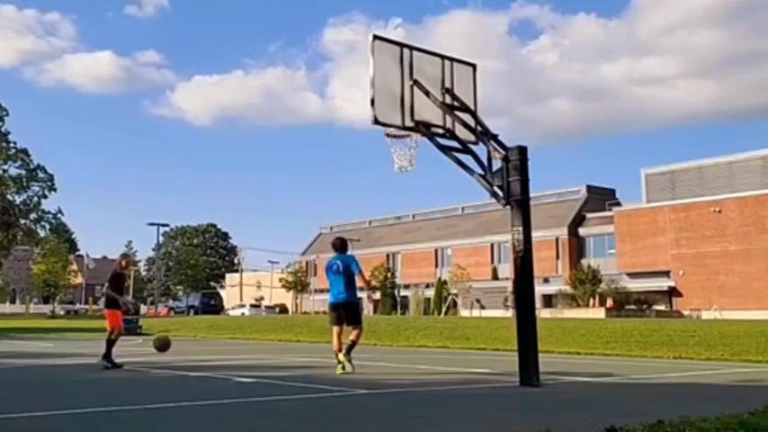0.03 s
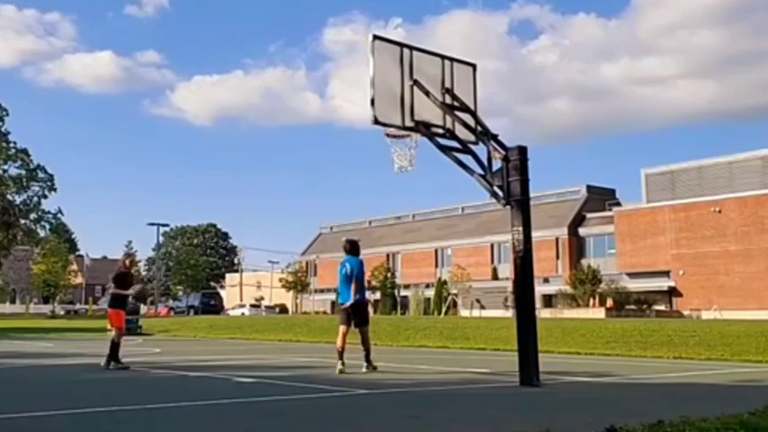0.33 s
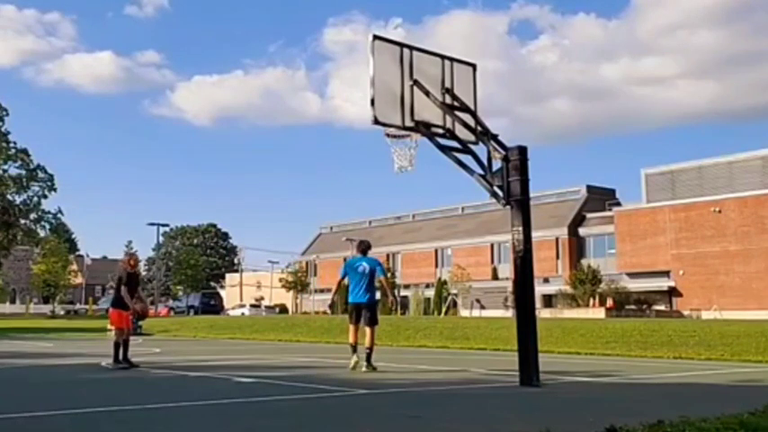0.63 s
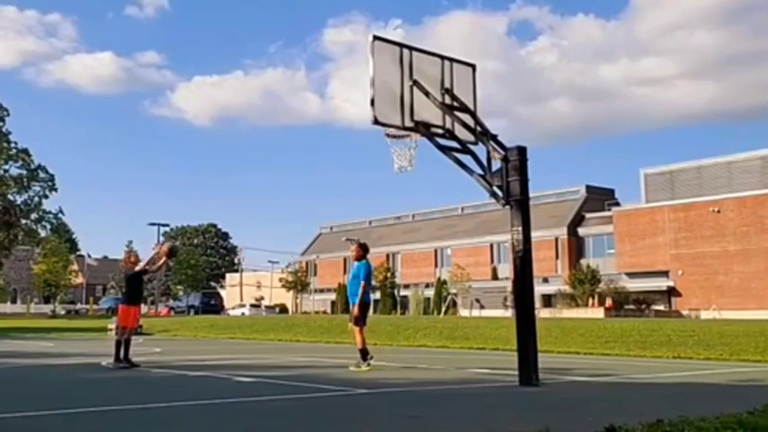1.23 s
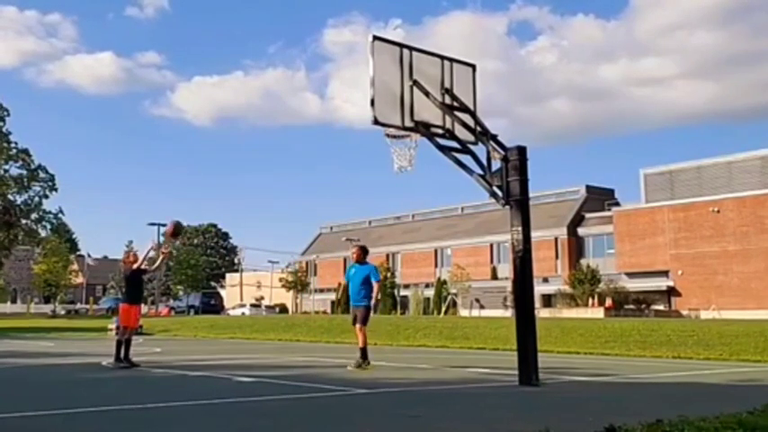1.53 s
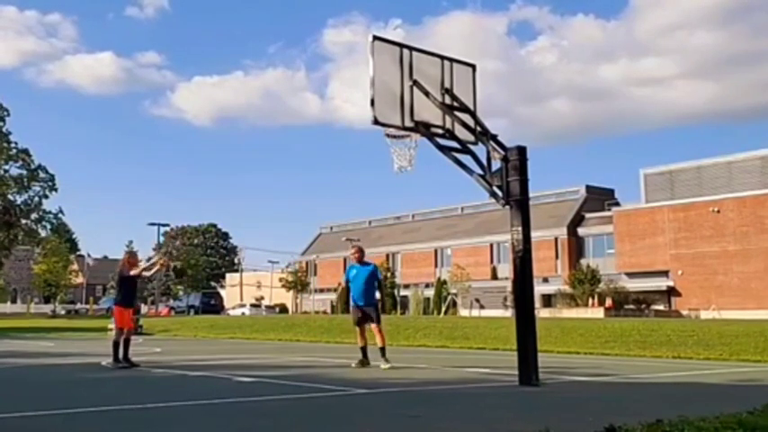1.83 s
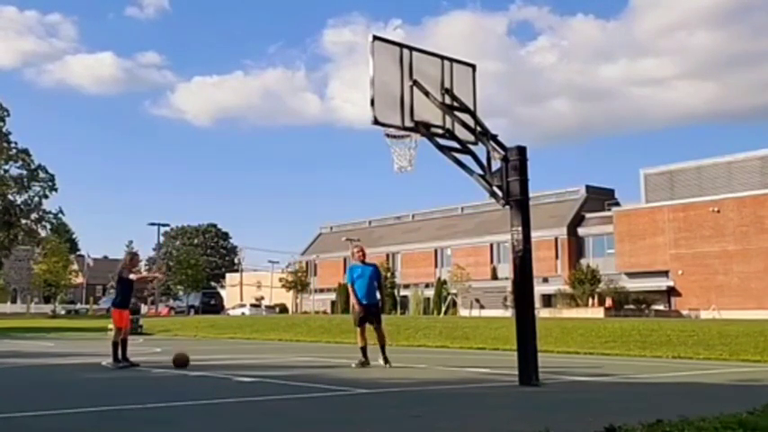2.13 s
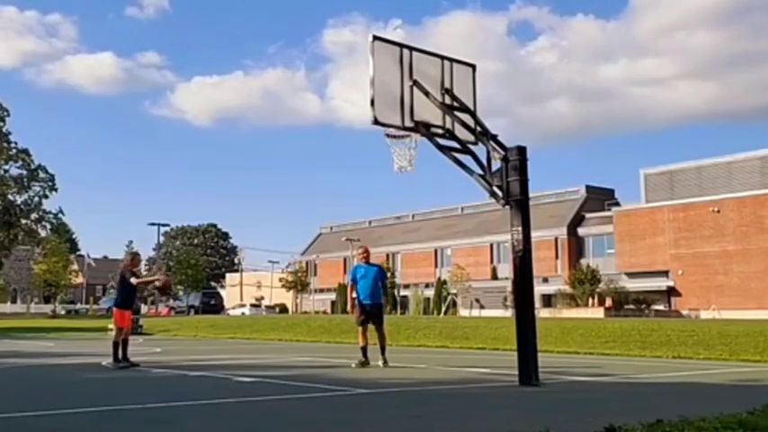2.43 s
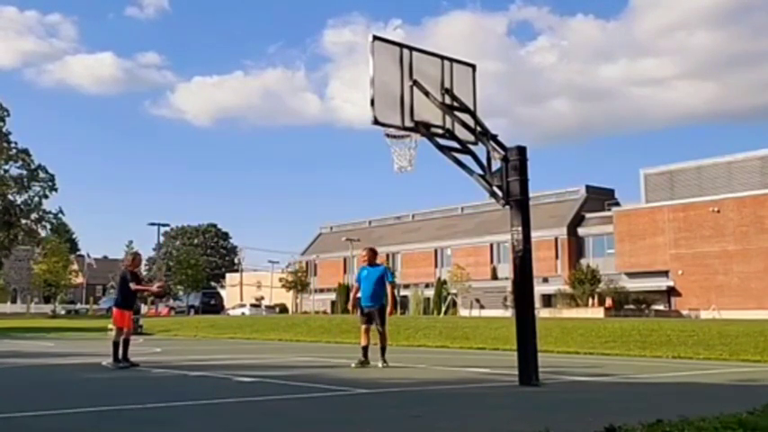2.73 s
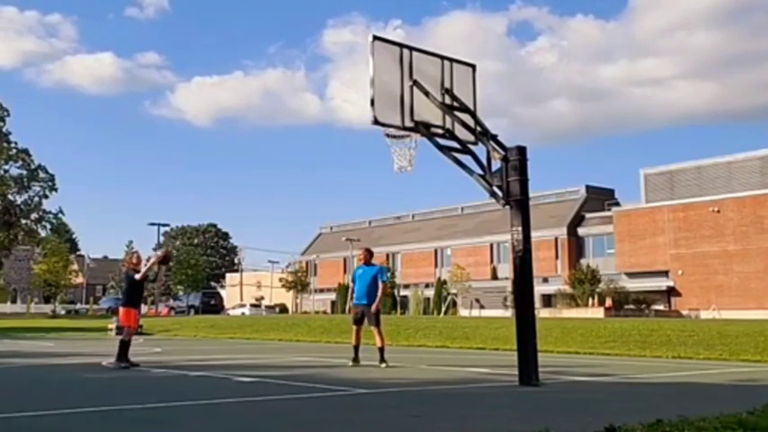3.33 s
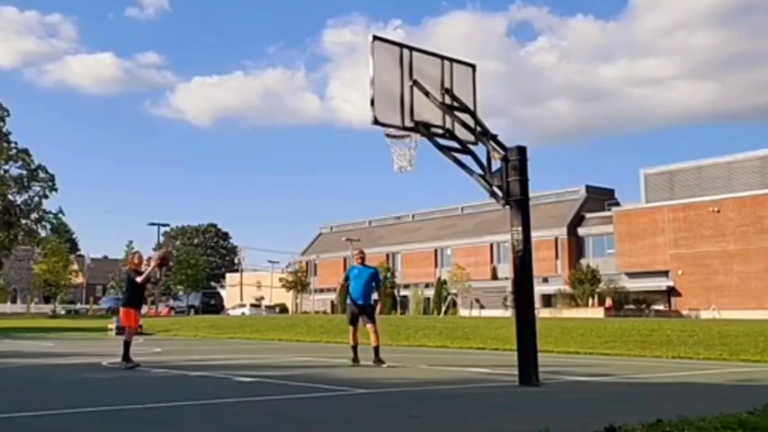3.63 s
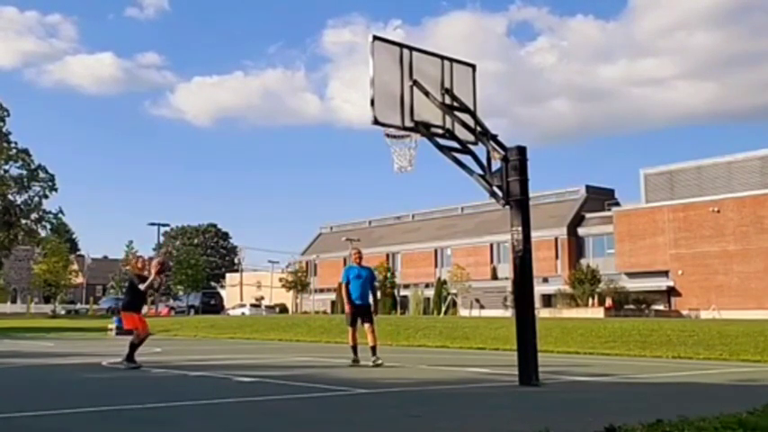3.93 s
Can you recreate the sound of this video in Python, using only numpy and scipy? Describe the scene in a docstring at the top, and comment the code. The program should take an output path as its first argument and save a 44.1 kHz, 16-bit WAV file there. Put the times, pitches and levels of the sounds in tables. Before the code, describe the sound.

Some metres away on an outdoor court, a basketball lands with a slapping thump. Shoes scuff and skid softly on gritty ground, then the ball bounces once more. Far traffic hums throughout, one engine rising at the end.

```python
"""Basketball on an outdoor court

A ball bounces twice on hard ground, some metres away. Each bounce is a slap of its skin, a deep
thump and a faint ping of the air inside, followed by a few echoes and a short wash of sound.
Shoes scuff and skid on the gritty surface, while distant traffic rumbles and swells behind."""
import sys
import numpy as np
from scipy import signal
from scipy.fft import rfft, irfft
from scipy.io import wavfile

SR = 44100
rng = np.random.default_rng(int(sys.argv[2]) if len(sys.argv) > 2 else 0)


def waveform_to_disk(signal):
    """Save audio, clipped to [-1, 1], as 16-bit WAV at the path in sys.argv[1]."""
    frames = np.transpose(np.atleast_2d(signal))
    scaled = np.clip(frames, -1, 1) * 32767
    samples = np.round(scaled).astype(np.int16)
    wavfile.write(sys.argv[1], SR, samples)


N = 176400
TIME = np.arange(N) / SR
FREQUENCIES = np.arange(N // 2 + 1) * SR / N
SHOE_FADE_S = 0.34   # every "fade" is the time a sound takes to drop by 60 dB
SCATTER_STEREO_DB = -34.5   # scattered sound differs a little between left and right

# When the ball lands, and how much each part of its sound is turned up or down:
# (time [s], thump [dB], slap [dB], crack [dB], ping [dB], tail [dB], rebound [dB])
BOUNCES = [(0.0940, 20, -18.5, -24.5, -61, -0.5, -2.5), (2.2863, 24.5, -26.5, -23.5, -49, -2, -17)]


def from_db(db):
    """Turn decibels into a number to multiply a sound by."""
    return 10 ** (np.asarray(db) / 20)


def at_hz(points, hz):
    """Read between the rows of a frequency table, with octaves evenly spaced."""
    known_hz, value = np.transpose(points)
    return np.interp(np.log(np.maximum(hz, 1)), np.log(known_hz), value)


def swell(points):
    """A volume that glides through a table of times and decibels."""
    return from_db(np.interp(TIME, *np.transpose(points)))


def butter(x, hz, kind, order=2):
    """A filter that keeps the lows, the highs or a band in between."""
    return signal.sosfilt(signal.butter(order, hz, kind, fs=SR, output="sos"), x + 1e-18)


def noise(spectrum, stereo_db=-59.5):
    """Noise shaped by a frequency table, almost the same on the left and right."""
    roll_off = 1 + (FREQUENCIES / spectrum[-1][0] / 2) ** 4
    colour = from_db(at_hz(spectrum, FREQUENCIES)) / roll_off
    mid, side = irfft(rfft(rng.standard_normal((2, N))) * colour, N)
    return (mid + from_db(stereo_db) * side * np.array([[1], [-1]])) / mid.std()


def rough_tone(hz, width_hz):
    """A tone that wavers at random; more width makes it rougher."""
    flutter = butter(rng.standard_normal((2, N)), width_hz, "low", order=3)
    phase = 2 * np.pi * np.cumsum(hz * np.ones(N)) / SR
    tone = np.real((flutter[0] + 1j * flutter[1]) * np.exp(1j * phase))
    return tone / tone.std()


def waver(x, depth_db, rate_hz):
    """Let a sound grow louder and softer at random."""
    slow = butter(rng.standard_normal(N), rate_hz, "low")
    return x * from_db(depth_db * slow / slow.std())


def ring(x, hz, fade_s):
    """Each click in x starts a pure tone that dies away."""
    decay = np.exp(-np.log(1000) / (fade_s * SR))
    angle = 2 * np.pi * hz / SR
    return signal.lfilter([0, np.sin(angle)], [1, -2 * decay * np.cos(angle), decay * decay], x + 1e-18)


def envelope(start, rise_s, hold_s, fade_s):
    """A volume that rises, holds, then dies away."""
    age = TIME - start
    fading = np.exp(-np.log(1000) * np.maximum(age - rise_s - hold_s, 0) / fade_s)
    return np.clip(age / rise_s, 0, 1) * fading


def delay(x, seconds):
    """The same sound, later."""
    return np.interp(TIME - seconds, TIME, x, left=0)


def still_air():
    """A faint, steady outdoor hiss."""
    # Colour of the hiss: (frequency [Hz], level per Hz [dB])
    hiss_colour = [(100, 11), (1200, 15), (2200, -2), (4000, 0.5), (6500, -1.5), (10000, -1.5), (15500, -8)]
    return from_db(-72.5) * noise(hiss_colour)


def traffic():
    """Far vehicles swell and fade: engines hum and drone, tyres roar and sometimes sing."""
    # Colours of the low rumble, engine drone and tyre roar: (frequency [Hz], level per Hz [dB])
    rumble_colour = [(20, -47), (30, -31), (42, -4.5), (55, 3.5), (105, -3), (140, -5.5), (200, -9.5),
                     (300, -32.5), (600, -37.5)]
    drone_colour = [(130, 1.5), (230, -1.5), (320, 3.5), (500, 0), (650, -10.5), (900, -31), (1600, -46.5)]
    roar_colour = [(450, -20.5), (700, -5.5), (850, 0), (1000, -3.5), (1300, -11.5), (1700, -24),
                   (2500, -32)]
    # Tones of one humming engine: (frequency [Hz], relative level [dB])
    hum_tones = [(99, -2.5), (136, -4)]
    # How each layer swells and fades: (time [s], level [dB])
    hum_levels = [(0, -53), (1.3, -51), (1.7, -45), (2.3, -56), (2.75, -41), (3.1, -40), (3.5, -43.5),
                  (4, -51)]
    rumble_levels = [(0, -41.5), (.6, -45.5), (1.25, -46.5), (1.9, -44.5), (2.45, -41), (2.85, -42.5),
                     (3.3, -43.5), (3.6, -47.5), (4, -39.5)]
    drone_levels = [(0, -49), (.25, -56.5), (.5, -45), (.8, -51.5), (1.24, -54.5), (1.5, -52), (1.78, -48),
                    (2.1, -54.5), (2.5, -52), (2.94, -44.5), (3.2, -51.5), (3.42, -49.5), (3.6, -51),
                    (3.8, -49), (4, -51.5)]
    roar_levels = [(0, -62), (.4, -56.5), (.8, -63.5), (1.24, -65), (1.75, -60.5), (2.1, -62.5), (2.5, -60),
                   (2.8, -59), (3.1, -62), (3.43, -58.5), (3.6, -65), (4, -54)]
    whine_levels = [(0, -74.5), (2.45, -71.5), (2.7, -58.5), (3.0, -63.5), (3.22, -59.5), (3.36, -60),
                    (3.43, -51.5), (3.58, -68.5), (3.67, -58.5), (3.8, -67.5), (3.95, -52), (4, -61)]
    hum = swell(hum_levels) * sum(from_db(db) * rough_tone(hz, width_hz=6.4) for hz, db in hum_tones)
    rumble = swell(rumble_levels) * noise(rumble_colour)
    drone = swell(drone_levels) * waver(noise(drone_colour), depth_db=1.93, rate_hz=8)
    tyre_roar = swell(roar_levels) * noise(roar_colour)
    tyre_whine = swell(whine_levels) * rough_tone(hz=884, width_hz=58)
    return hum + rumble + drone + tyre_roar + tyre_whine


def bounce(start, thump_db, slap_db, crack_db, ping_db, rebound_db):
    """The ball hits the ground, flattens and springs back; its shell wobbles and the air inside rings."""
    # Tones of the slapping skin and the air inside: (frequency [Hz], relative level [dB], fade [s])
    skin_tones = [(467, -10.5, 0.045), (824, -8.5, 0.037), (1041, -3, 0.023), (1774, -18.5, 0.035)]
    air_tones = [(970, -7, 0.16), (1130, 13, 0.094), (1588, 0, 0.18), (1730, -2, 0.14), (1985, -13, 0.085),
                 (2320, -8, 0.35), (2680, -24, 0.22), (3400, -11, 0.1), (3840, -13, 0.24)]
    # Grit crushed under the ball: (frequency [Hz], level per Hz [dB])
    grit_colour = [(2000, -31), (4000, 12.5), (5500, -5), (7500, -10), (11000, -8.5), (15500, -24)]
    click = np.zeros(N)
    click[int(start * SR)] = 1
    release = delay(click, 0.003544)   # the flattened ball springs back
    rebound = from_db(rebound_db) * release
    bass = butter(click, 217.6, "low", order=3)
    thump = -from_db(thump_db) * butter(bass, 62, "high", order=5)
    wobble = -from_db(thump_db - 46) * ring(release, hz=80.4, fade_s=0.21)
    knock = from_db(20.5) * butter(rebound, [78, 283], "band")
    skin_hits = click + from_db(-7.5) * rebound
    slap = sum(from_db(slap_db + db) * ring(skin_hits, hz, fade) for hz, db, fade in skin_tones)
    crush = envelope(start, rise_s=0.00013, hold_s=0.00033, fade_s=0.0081)
    grit = from_db(-9) * noise(grit_colour)[0] * crush
    crack = from_db(crack_db) * (grit - 2 * butter(click, [2250, 5900], "band"))
    ping = sum(from_db(ping_db + db) * ring(click, hz, fade) for hz, db, fade in air_tones)
    return thump + wobble + knock + slap + crack + ping


def court_tail():
    """A wash of scattered sound follows each bounce; each frequency band dies at its own rate."""
    # Colour of the wash: (frequency [Hz], level per Hz [dB])
    wash_colour = [(30, -36), (60, -2.5), (90, 2.5), (150, -3.5), (240, 0), (340, -17), (480, -16),
                   (640, -24), (1100, -19.5), (1450, -25), (1800, -25.5), (2700, -31.5), (4000, -30.5),
                   (5800, -34.5), (7500, -41.5), (10000, -39), (15500, -55)]
    # How long each band lasts: (frequency [Hz], fade [s])
    band_fades = [(70, 0.46), (250, 0.2), (1000, 0.3), (4000, 0.34), (12000, 0.32)]
    wash = rfft(noise(wash_colour, SCATTER_STEREO_DB))
    out = 0
    for centre, fade in band_fades:
        band = at_hz([(hz, float(hz == centre)) for hz, _ in band_fades], FREQUENCIES)
        level = sum(from_db(tail_db - 30) * envelope(start, rise_s=0.002, hold_s=0.029, fade_s=fade)
                    for start, *_, tail_db, _ in BOUNCES)
        out = out + level * irfft(wash * band, N)
    return out


def court_echoes(ball):
    """The court sends back duller copies of each bounce, with a splash of scatter after the first."""
    # Echoes from around the court: (delay [s], level [dB], low edge [Hz], high edge [Hz])
    reflections = [(0.024, -6.5, 1430, 3400), (.0275, -8, 192, 500), (0.045, -7.5, 60, 161)]
    # Colour of the splash: (frequency [Hz], level per Hz [dB])
    splash_colour = [(800, -12), (1200, -22), (1900, 21), (2700, -8), (3800, 8), (7000, -40)]
    echoes = sum(from_db(db) * delay(butter(ball, [low, high], "band", order=1), lag)
                 for lag, db, low, high in reflections)
    first_lag = reflections[0][0]
    bursts = sum(envelope(start + first_lag, rise_s=0.00036, hold_s=0.00092, fade_s=0.044)
                 for start, *_ in BOUNCES)
    return echoes + from_db(-47.5) * noise(splash_colour, SCATTER_STEREO_DB) * bursts


def thin_ring():
    """A faint high tone swells and lingers after each bounce."""
    level = sum(envelope(start + 0.087, rise_s=0.07, hold_s=0.17, fade_s=0.5) for start, *_ in BOUNCES)
    return from_db(-81) * level * rough_tone(hz=2890, width_hz=23)


def shoe_scuffs():
    """Soles brush the court, making a rasp with fine grit above it."""
    # One row for each scuff:
    # (time [s], rise [s], hold [s], rasp low edge [Hz], rasp high edge [Hz], rasp [dB], grit [dB])
    scuffs = [(0.255, 0.0064, 0.015, 2340, 6800, -62, -69), (0.29, 0.016, 0.0098, 2720, 6000, -67.5, -79),
              (0.429, .015, .02, 1500, 4500, -78, -74), (0.767, 0.018, 0.033, 3000, 5170, -78.5, -90),
              (1.42, 0.023, .015, 3000, 6000, -81, -80.5), (1.6, 0.14, .05, 3000, 4750, -81.5, -95),
              (2.043, 0.14, 0.048, 4243, 6540, -69.5, -71.5), (3.148, 0.028, 0.052, 3200, 4840, -70.5, -81)]
    # Grit under a sole: (frequency [Hz], level per Hz [dB])
    grit_colour = [(3000, -8), (6000, -12), (10000, 8), (13000, -5.5), (16000, -6)]
    hiss = rng.standard_normal(N)
    grit = noise(grit_colour)
    out = 0
    for start, rise, hold, low, high, rasp_db, grit_db in scuffs:
        rasp = butter(hiss, [low, high], "band")
        scrape = from_db(rasp_db) * rasp / rasp.std() + from_db(grit_db) * grit
        out = out + envelope(start, rise, hold, SHOE_FADE_S) * scrape
    return out


def shoe_skid():
    """One hard rub, with a rough squeak that falls in pitch as the shoe stops."""
    # Colour of the rubbing sole: (frequency [Hz], level per Hz [dB])
    rub_colour = [(1000, -8), (1700, -8.5), (2200, -4), (2600, -11), (3100, -3), (4600, -9), (5400, -16),
                  (7500, -21), (10000, -19), (15000, -37)]
    start, rise_s, hold_s = 0.852, 0.022, 0.004
    squeak_hz, fall_octaves_per_s = 4500, 12
    rub = from_db(-51.5) * noise(rub_colour) * envelope(start, rise_s, hold_s, SHOE_FADE_S)
    slide_s = np.clip(TIME - start, 0, rise_s + 2 * hold_s)
    squeak = rough_tone(squeak_hz * 2 ** (-fall_octaves_per_s * slide_s), width_hz=620)
    return rub + from_db(-50.5) * squeak * envelope(start, rise_s / 2, hold_s=rise_s, fade_s=0.12)


def engine_rev():
    """A far engine gets higher and louder at the end."""
    # The rising engine note: (time [s], pitch [Hz], level [dB])
    engine_note = [(3.6, 265, -76), (3.88, 285, -61.5), (3.961, 305.3, -43.5), (4, 310, -45)]
    times, hz, db = np.transpose(engine_note)
    return from_db(np.interp(TIME, times, db)) * rough_tone(np.interp(TIME, times, hz), width_hz=35)


def scene():
    """Ball and shoes in front, traffic behind."""
    ball = sum(bounce(start, thump, slap, crack, ping, rebound)
               for start, thump, slap, crack, ping, _, rebound in BOUNCES)
    court = court_echoes(ball) + court_tail()
    shoes = shoe_scuffs() + shoe_skid()
    background = traffic() + engine_rev() + still_air()
    return ball + court + shoes + background + thin_ring()


def record(dry):
    """The microphone softens one band of the treble and cuts off the very top."""
    dip_hz, dip_width_hz, dip_depth, cutoff_hz = 7680, 2740, 0.55, 15700
    treble_band = signal.lfilter(*signal.iirpeak(dip_hz, dip_hz / dip_width_hz, fs=SR), dry)
    top_cut = signal.ellip(10, 0.1, 80, cutoff_hz, fs=SR, output="sos")
    return signal.sosfilt(top_cut, dry - dip_depth * treble_band)


dry = scene()
out = record(dry)
waveform_to_disk(out)
```